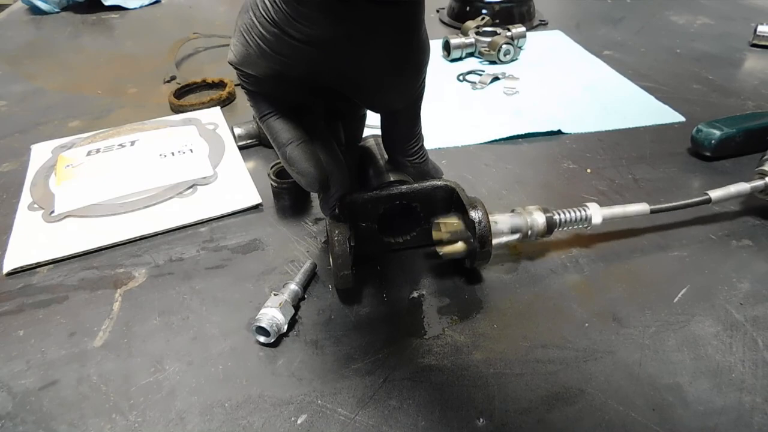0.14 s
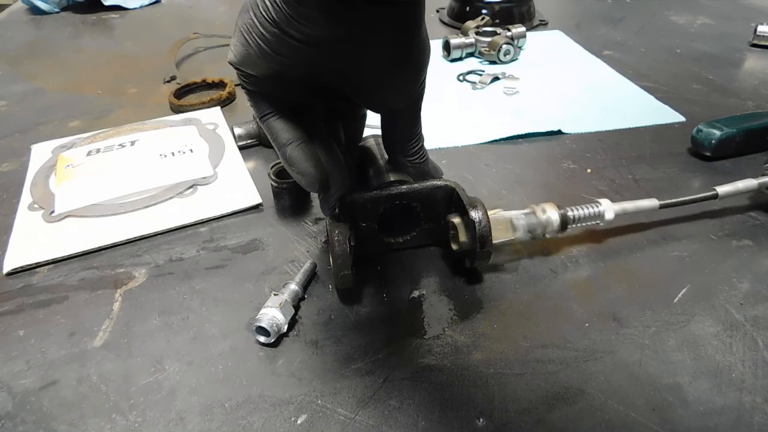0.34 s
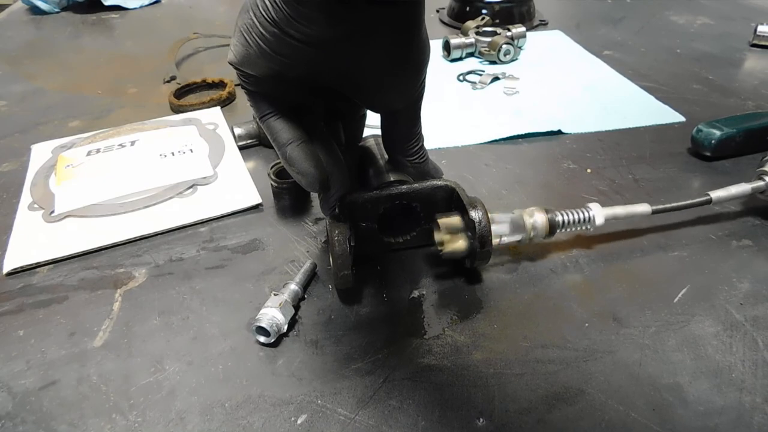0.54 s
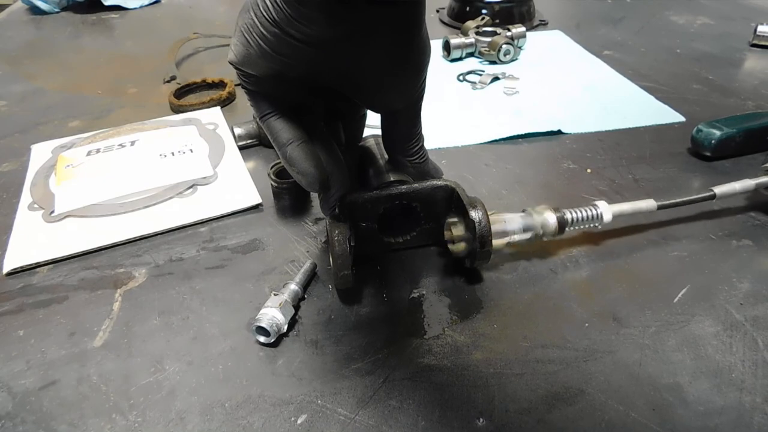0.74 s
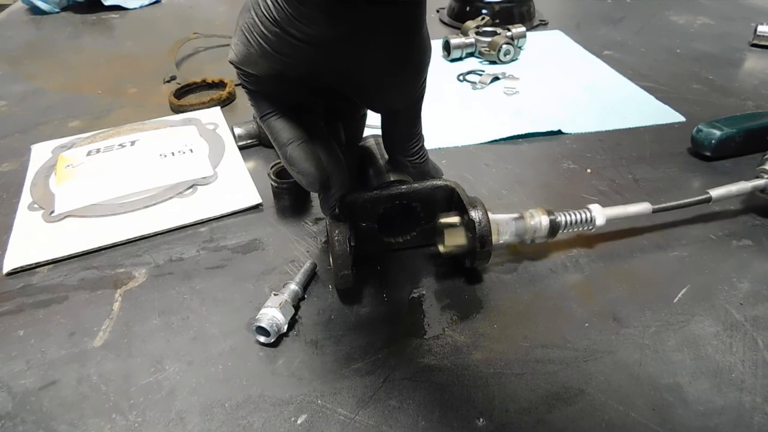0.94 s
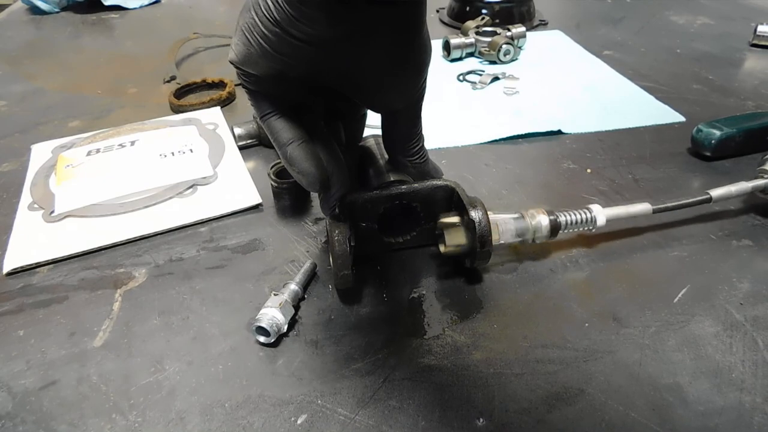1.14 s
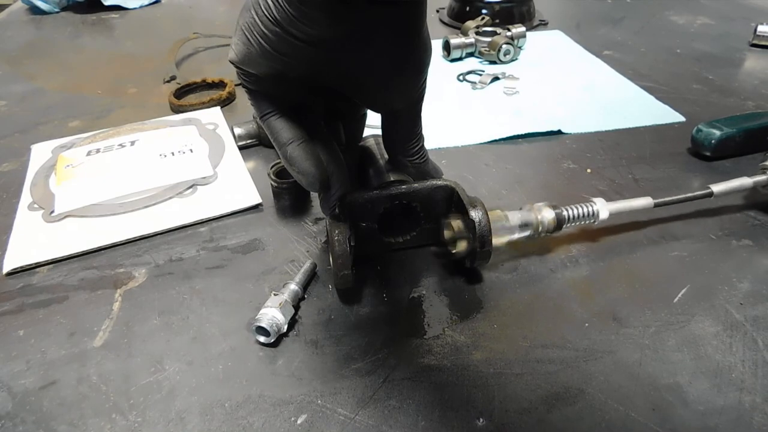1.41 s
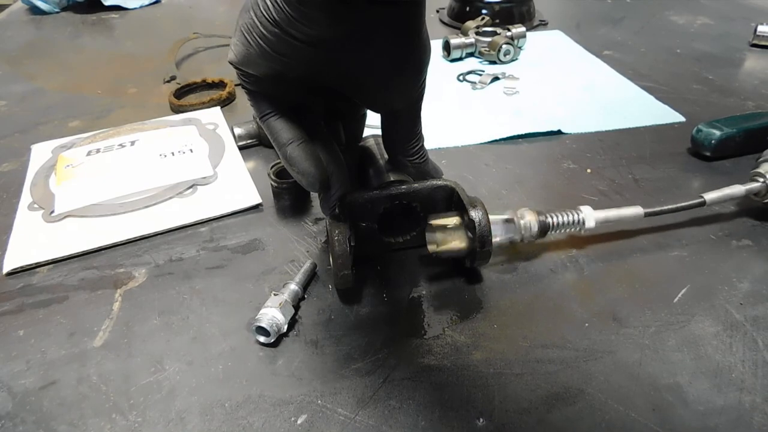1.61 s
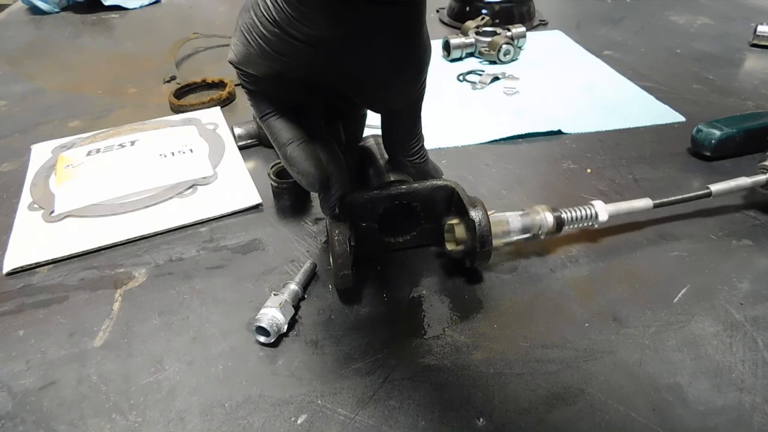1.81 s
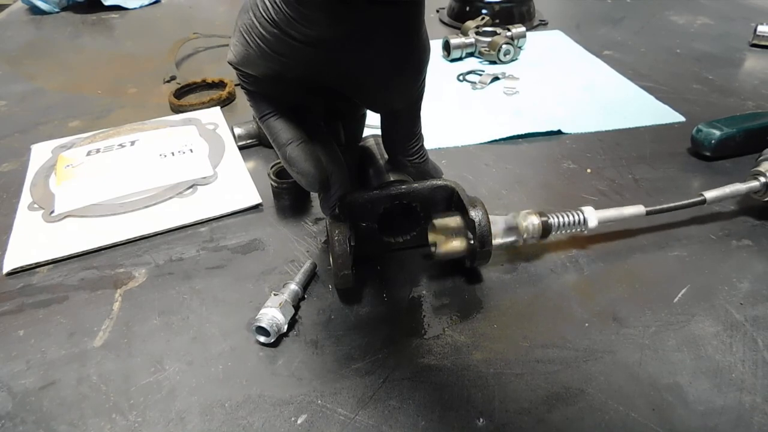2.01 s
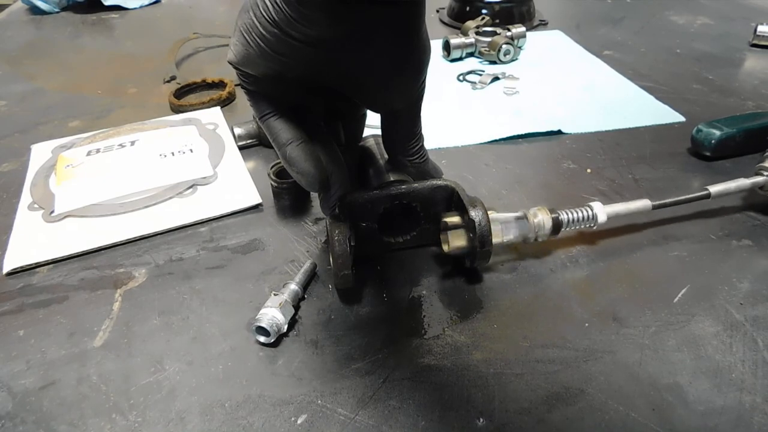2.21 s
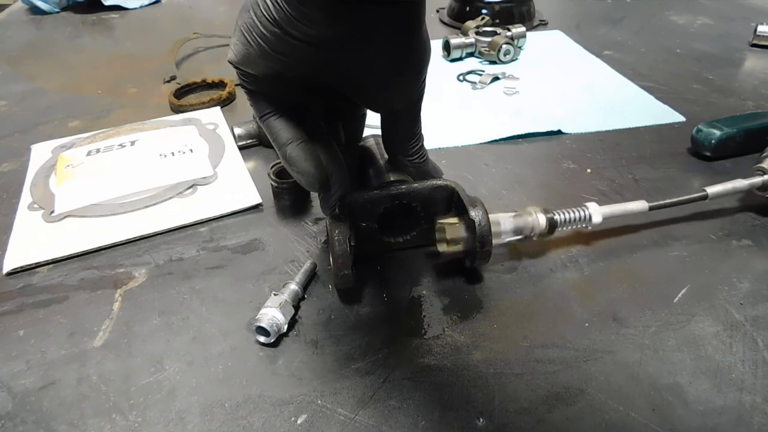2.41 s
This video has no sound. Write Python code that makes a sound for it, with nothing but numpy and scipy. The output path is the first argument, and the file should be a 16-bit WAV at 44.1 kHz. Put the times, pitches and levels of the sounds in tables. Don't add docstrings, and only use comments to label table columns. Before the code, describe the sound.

An electric drill runs throughout, its piercing whine near 3.8 kHz over a broad, rough motor roar, slightly right. Hone stones scrape an iron bore in surges at about 0.1, 0.5, 0.9, 1.2, 1.6, 2.0 and 2.3 seconds, with rapid bright knocks and dull bench thumps. Pitch rises slightly after 1.05, then falls from 2.25 as the motor slows, with loose clacks around 2.4. Close, dry workshop sound.

```python
import sys
import numpy as np
from scipy import signal
from scipy.fft import rfft, irfft, next_fast_len
from scipy.io import wavfile

SR = 44100
rng = np.random.default_rng(int(sys.argv[2]) if len(sys.argv) > 2 else 0)


def undo_db(level):
    steps = np.asarray(level, float) / 20
    return 10 ** steps


def generate_wav(signal):
    frames = np.transpose(np.atleast_2d(signal))
    scaled = np.clip(frames, -1, 1) * 32767
    pcm = np.round(scaled).astype(np.int16)
    wavfile.write(sys.argv[1], SR, pcm)


N = 112454
T = np.arange(N) / SR
PAD = next_fast_len(N + SR)
HZ = np.arange(PAD // 2 + 1) * SR / PAD + 1e-3

# (time [s], frequency [Hz], level [dB])
COMMUTATOR = [(0, 3785, -1), (.2, 3776, 0), (.78, 3791, 0), (1.02, 3788, 0), (1.08, 3887, 3),
              (1.12, 3942, -1), (1.19, 3988, -1), (1.3, 4001, 0), (1.5, 4021, 1), (2.21, 4016, 1),
              (2.25, 3962, -1), (2.39, 3652, 3), (2.415, 3595, -12), (2.55, 3330, -24)]
# (multiple of rotor speed [-], level re whine [dB])
ROTOR_ORDERS = [(1, -29.5), (2, -31), (3.08, -26), (4.62, -24), (5, -20.5), (10, -24.5), (11, -21),
                (11.26, -17.5), (13, -19), (16, -26), (20, -19), (23, -19.5), (25, -28), (30, -34)]
# (frequency [Hz], width [Hz], boost [dB])
CASING_MODES = [(253, 15, 2), (1260, 60, 6), (2525, 60, 12), (3012, 60, 9), (3480, 60, 3)]
# (frequency [Hz], density [dB per Hz])
ROAR_COLOUR = [(40, -50), (250, -25.5), (600, -14), (1200, -9), (2000, -6.5), (3700, -6.5), (4300, -12),
               (15700, -20.5)]
# (frequency [Hz], width [Hz], boost [dB])
HOUSING_MODES = [(248, 58, 10), (880, 96, -3.5), (1303, 20, -1.5), (1910, 220, 6), (2660, 600, 2),
                 (3110, 82, 1.5), (4140, 67, -17.5), (5000, 140, 5)]
# (start [s], length [s], pressure [dB])
PUSHES = [
    (0.116, 0.13, -1),
    (0.519, 0.12, -1),
    (0.879, 0.12, -0.5),
    (1.212, 0.19, 0.5),
    (1.632, 0.17, -0.5),
    (1.994, 0.15, -1),
    (2.3, 0.18, -3),
]
# (place in the turn [0-1], knock level [dB])
STONES = [(0, -4), (0.363, 2), (0.733, 0.5)]
# (time [s], level [dB])
LOOSE_CLACKS = [(.025, -17), (0.123, -28), (.227, -30), (.246, -27), (1.151, -25), (1.891, -19),
                (2.34, -26), (2.392, -14), (2.413, -18), (2.427, -13), (2.446, -15), (2.449, -21.5),
                (2.503, -20)]
# (frequency [Hz], density [dB per Hz])
GRIT_COLOUR = [(300, -35), (1000, -16), (3000, -6.5), (5500, -2), (8500, -4), (11500, -4), (14000, -2.5),
               (15800, -6.5)]
# (frequency [Hz], width [Hz], boost [dB])
IRON_MODES = [(4600, 240, 1.5), (5070, 200, 2), (6030, 250, 3), (7870, 300, 6), (8880, 300, 4),
              (9750, 300, 3.5), (10300, 300, 2.5), (14200, 1400, 3)]
# (centre [Hz], width [octaves], level [dB])
IRON_ZONES = [(3500, 0.38, -3.5), (5850, 0.24, -2), (9230, 0.27, 0), (13300, 0.19, -4.5)]
# (frequency [Hz], density [dB per Hz])
RUMBLE_COLOUR = [(20, -6), (40, -4.5), (100, -3), (250, -5), (600, -1), (1200, 3.5), (3000, -52)]
# (frequency [Hz], phase [rad])
PORT_LAG = [(0, -0.5), (2760, -2), (4050, -2.5), (6030, -5), (6460, -5), (9650, -7.5), (15400, -9.5)]
# (frequency [Hz], level [dB])
DIFFUSE_SHARE = [(100, 9.5), (600, -10), (1200, -4.5), (2500, -2), (5000, 3), (8000, -2), (15000, 2)]
# (frequency [Hz], level [dB])
CASE_SHADE = [(200, -3.5), (700, 5.5), (1300, 3.5), (2400, 0), (4400, 1.5), (8100, 0.5), (15000, -2)]

RUMBLE_PAN_DB, MOTOR_PAN_DB, WHINE_PAN_DB, HONE_PAN_DB = -6, -4.5, -8, -2.5
WHINE_WET_DB, HONE_WET_DB = -15, 2
WHINE_DB, SEGMENTS, GEAR_RATIO = -25.5, 15, 13
FLUTTER_DB, FLUTTER_HZ, WOBBLE_RATIO, WOBBLE_HZ = 0.5, 20, 0.00088, 43
ROAR_DB, ROAR_DB_PER_OCTAVE, ROAR_PATCHY_DB = -23.5, 2.5, 0.3
IDLE_DB, PRESS_S, EASE_S = -10.5, 0.08, 0.11
FIRST_STONE_S = 1.691
KNOCK_DB, KNOCK_SPREAD_DB, KNOCK_JITTER_S = -17.5, 1.2, 0.0007
KNOCK_POWER, KNOCK_S, ZONE_SPREAD_DB = 1.2, 0.0011, 2.2
BOUNCE_S, BOUNCE_DB, BOUNCE_SPREAD_DB = -0.0045, -1, 4
SCRAPE_DB, SCRAPE_PATCHY_DB, GRAINS_PER_S, GRAIN_SPREAD_DB = -29.5, 1.4, 5500, -2.5
RUMBLE_DB, RUMBLE_POWER, RUMBLE_SHARED = -35, 0.88, 0.5
THUMP_DB, THUMP_S = -1.5, 0.0067


def rms_one(x):
    return x / np.sqrt(np.mean(x ** 2) + 1e-20)


def at_hz(points):
    hz, value = np.transpose(points)
    return np.interp(np.log(HZ), np.log(hz + 1), value)


def filtered(x, response):
    return irfft(rfft(x, PAD) * response, PAD)[..., :N]


def body(spectrum, peaks=()):
    response = undo_db(at_hz(spectrum)) + 0j
    for hz, width_hz, db in peaks:
        detuning = (HZ / hz - hz / HZ) * hz / width_hz
        response = response * (1 + (undo_db(db) - 1) / (1 + 1j * detuning))
    return response / np.sqrt(np.mean(np.abs(response) ** 2))


def drift(rate_hz):
    return rms_one(filtered(rng.standard_normal(N), 1 / (1 + (HZ / rate_hz) ** 2)))


def place(x, pan_db, wet_db=0):
    hz, lead_rad = np.transpose(PORT_LAG)
    left_lag = np.exp(1j * np.interp(HZ, hz, lead_rad))
    direct = filtered(x[0], np.array([left_lag, np.ones_like(HZ)]))
    diffuse = filtered(x[1:], undo_db(at_hz(DIFFUSE_SHARE) + wet_db))
    return undo_db([[pan_db / 2], [-pan_db / 2]]) * (direct + diffuse)


def speed():
    s, hz, db = np.transpose(COMMUTATOR)
    return np.interp(T, s, hz) / SEGMENTS, WHINE_DB + np.interp(T, s, db)


def pressure():
    gain = undo_db(IDLE_DB) + 0 * T
    for s, length_s, db in PUSHES:
        corners_s = [s - PRESS_S, s, s + length_s, s + length_s + EASE_S]
        ramp = np.sin(np.pi / 2 * np.interp(T, corners_s, [0, 1, 1, 0])) ** 2
        gain = np.maximum(gain, undo_db(IDLE_DB + (db - IDLE_DB) * ramp))
    return gain


def knocks():
    spindle = np.cumsum(speed()[0]) / SR / GEAR_RATIO
    spindle = spindle - np.interp(FIRST_STONE_S, T, spindle)
    clicks = np.zeros(N)
    press = pressure()
    for share, db in STONES:
        turn = np.arange(np.ceil(spindle[0]), spindle[-1] - 1) + share
        jitter, strength, gap, loss = rng.standard_normal((80, 4))[:len(turn)].T
        hit_s = np.interp(turn, spindle, T) + KNOCK_JITTER_S * jitter
        i = np.clip(hit_s * SR, 0, N - 1).astype(int)
        clicks[i] = undo_db(KNOCK_DB + db + KNOCK_SPREAD_DB * strength) * press[i] ** KNOCK_POWER
        tick = np.clip(i + BOUNCE_S * SR * (1 + 0.15 * gap), 0, N - 1).astype(int)
        clicks[tick] += clicks[i] * undo_db(BOUNCE_DB - BOUNCE_SPREAD_DB * np.abs(loss))
    for s, db in LOOSE_CLACKS:
        clicks[int(s * SR)] += undo_db(db)
    return clicks


def burst(clicks, seconds):
    half = SR // 20
    u = T[:SR // 10] - T[half]
    return signal.fftconvolve(clicks, np.exp(-np.abs(u / seconds) ** 1.8))[half:half + N]


def bench(hits):
    shaking = rng.standard_normal((2, N)) + RUMBLE_SHARED * rng.standard_normal(N)
    noise = filtered(shaking, body(RUMBLE_COLOUR))
    thumps = undo_db(THUMP_DB - KNOCK_DB) * burst(hits, THUMP_S)
    gain = pressure() ** RUMBLE_POWER + thumps
    return undo_db(RUMBLE_DB) * gain * noise * undo_db([[RUMBLE_PAN_DB], [0]])


def roar():
    rotor, _ = speed()
    noise = filtered(rng.standard_normal((3, N)), body(ROAR_COLOUR, HOUSING_MODES))
    octaves = np.log2(rotor / rotor[0])
    return noise * undo_db(ROAR_DB + ROAR_DB_PER_OCTAVE * octaves + ROAR_PATCHY_DB * drift(13))


def whine():
    rotor, level_db = speed()
    turns = np.cumsum(rotor * (1 + WOBBLE_RATIO * drift(WOBBLE_HZ))) / SR
    tones = np.zeros((3, N))
    for path in range(3):
        for order, db in [(SEGMENTS, 0)] + ROTOR_ORDERS:
            gain = undo_db(level_db + db + FLUTTER_DB * drift(FLUTTER_HZ))
            tones[path] += gain * np.sin(2 * np.pi * (order * turns + rng.random()))
    return filtered(tones * np.sqrt(2), body([(100, 0), (15000, 0)], CASING_MODES))


def hone(hits):
    present = rng.random((3, N)) < GRAINS_PER_S / SR
    size = undo_db(GRAIN_SPREAD_DB * rng.exponential(1, (3, N)))
    grains = present * rng.choice([-1, 1], (3, N)) * size
    out = undo_db(SCRAPE_DB + SCRAPE_PATCHY_DB * drift(60)) * pressure() * rms_one(grains)
    for hz, octaves, db in IRON_ZONES:
        struck = burst(hits * undo_db(db + ZONE_SPREAD_DB * rng.standard_normal(N)), KNOCK_S)
        zone = np.exp(-0.5 * (np.log2(HZ / hz) / octaves) ** 2)
        out = out + filtered(struck * rng.standard_normal((3, N)), zone)
    return filtered(out, body(GRIT_COLOUR, IRON_MODES))


def scene():
    hits = knocks()
    mix = bench(hits)
    mix = mix + place(roar(), MOTOR_PAN_DB)
    mix = mix + place(whine(), WHINE_PAN_DB, WHINE_WET_DB)
    return mix + place(hone(hits), HONE_PAN_DB, HONE_WET_DB)


def low_pass(x):
    return signal.sosfilt(signal.butter(12, 15810, fs=SR, output="sos"), x)


def record(dry):
    ceiling, cutoff_hz = 1.1, 15790
    shade_db = at_hz(CASE_SHADE) / 2
    shaded = filtered(dry, np.array([undo_db(shade_db), undo_db(-shade_db)]))
    rounded = ceiling * np.tanh(shaded / ceiling)
    mix = filtered(rounded, np.clip((cutoff_hz + 30 - HZ) / 60, 0, 1))
    return low_pass(mix)


dry = scene()
out = record(dry)
generate_wav(out)
```